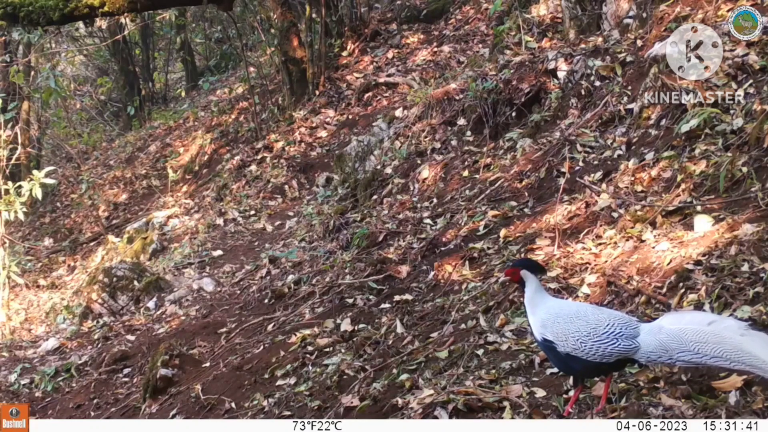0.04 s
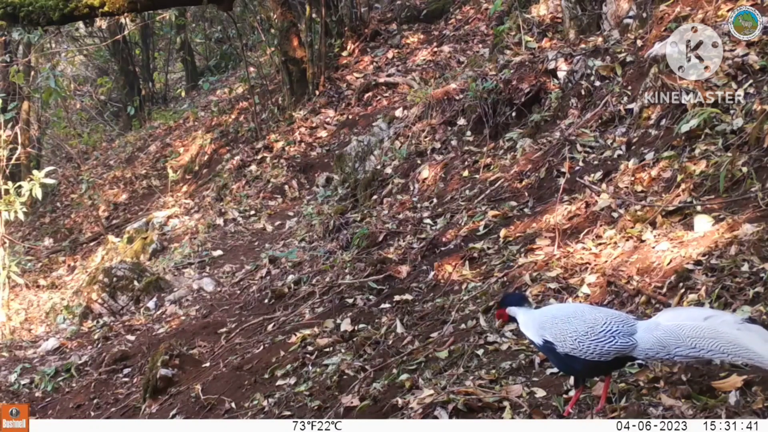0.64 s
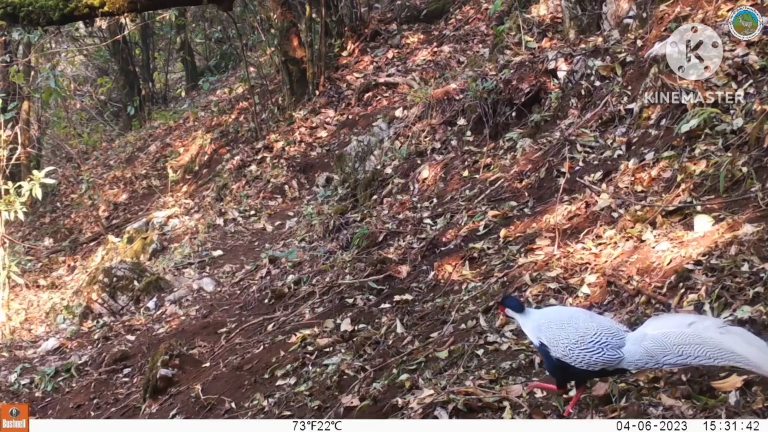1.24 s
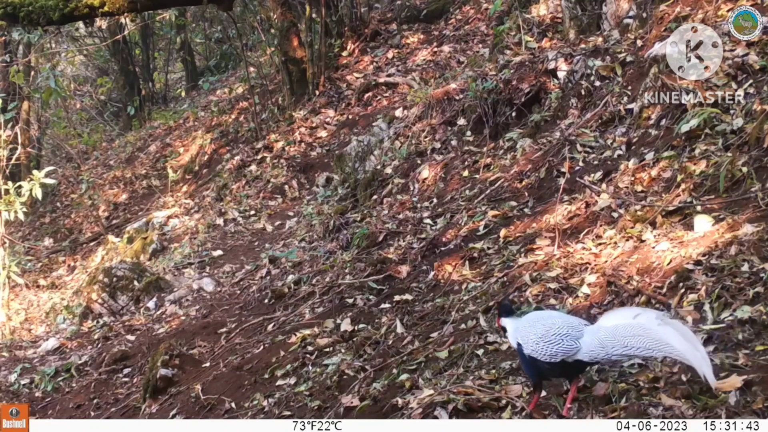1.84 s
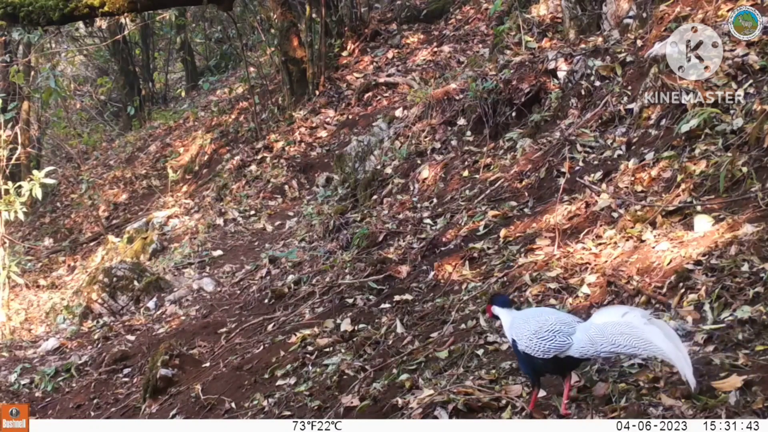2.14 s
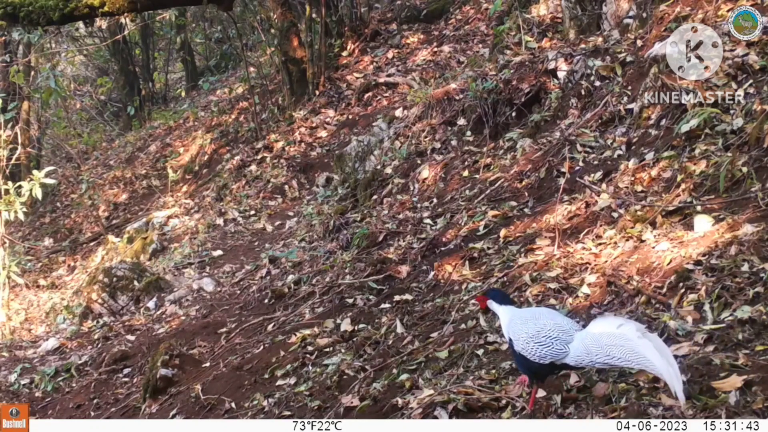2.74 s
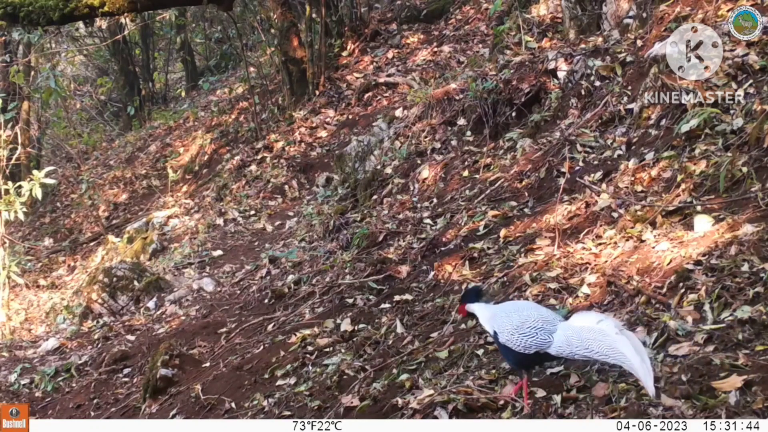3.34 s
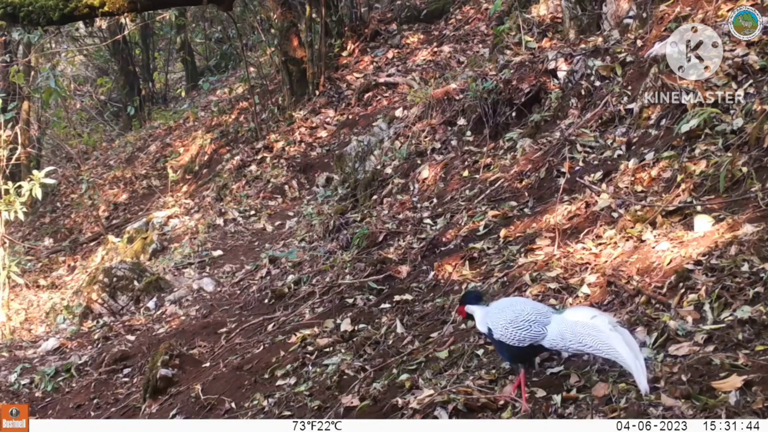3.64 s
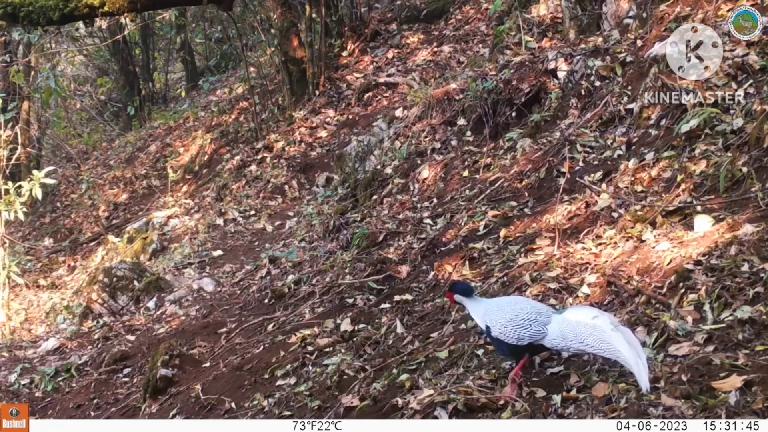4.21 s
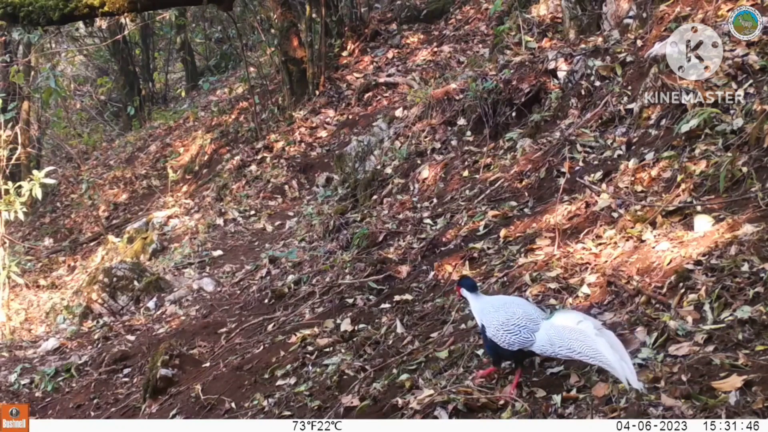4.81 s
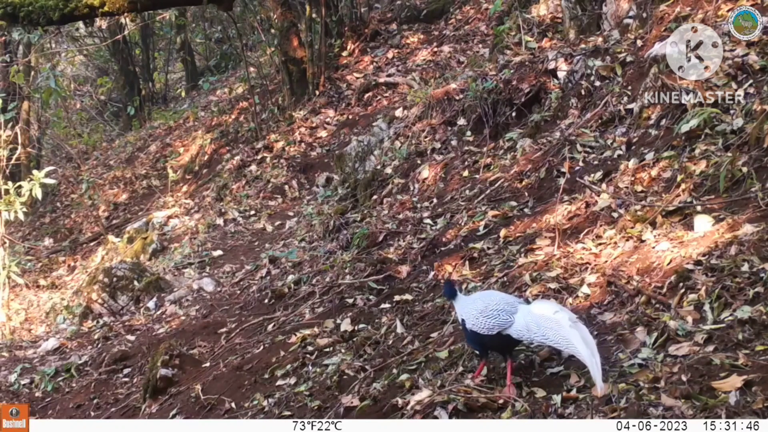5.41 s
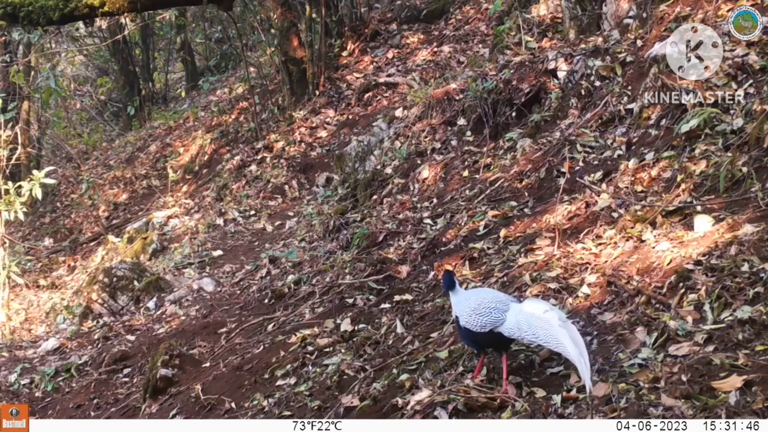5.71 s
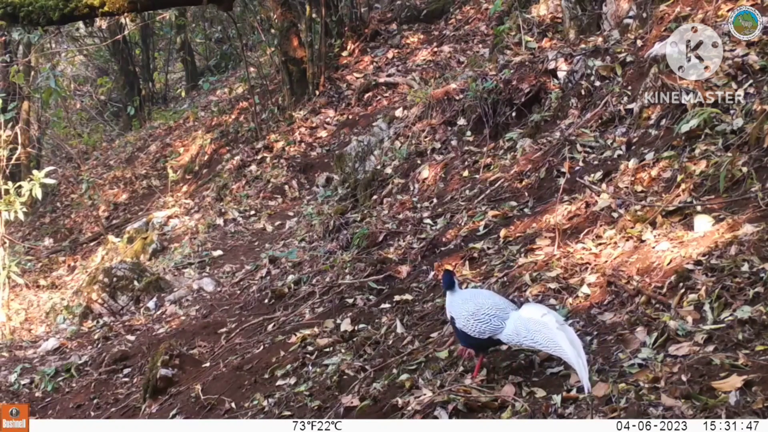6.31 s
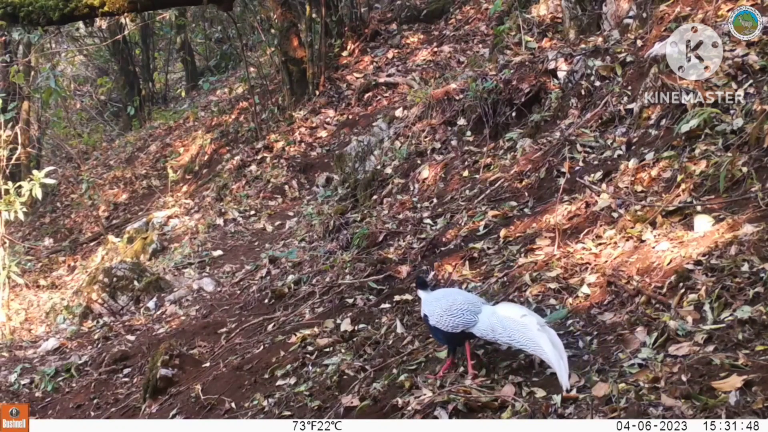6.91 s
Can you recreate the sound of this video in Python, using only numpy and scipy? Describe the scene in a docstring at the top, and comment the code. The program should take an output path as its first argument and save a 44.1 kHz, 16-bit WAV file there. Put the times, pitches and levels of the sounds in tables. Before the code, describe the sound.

Soft, low pheasant clucks surround a single piercing, climbing whistle, followed by crackling leaves over a quiet forest hush and insects.

```python
"""A pheasant in the woods

A pheasant walks over crackling dry leaves, clucking softly about five times a second. Once, its
cluck rises into a growl and its voice box breaks into a loud whistle that climbs and snaps down.
The trees echo it. Insects swell and fade, small birds call far off, and a distant engine hums."""
import sys
import numpy as np
from scipy import signal
from scipy.fft import rfft, irfft, next_fast_len
from scipy.io import wavfile
from scipy.ndimage import map_coordinates

SR = 44100
rng = np.random.default_rng(int(sys.argv[2]) if len(sys.argv) > 2 else 0)


def generate_wav(sig):
    """Save sig (samples, or channels by samples) to the path in sys.argv[1] as 16-bit PCM at SR."""
    pcm = np.round(np.clip(np.atleast_2d(sig).T, -1, 1) * 32767).astype(np.int16)
    wavfile.write(sys.argv[1], SR, pcm)


N = 306494
TIME = np.arange(N) / SR

# How the throat shapes the voice with the beak closed. Each row: frequency in Hz, gain in dB.
THROAT = [(120, 7), (200, -0.5), (330, -0.5), (450, -11.5), (620, -17.5), (780, -14), (930, -9.5),
          (1100, -9.5), (1300, -18), (1520, -25), (2100, -31), (2600, -38)]


def clucks():
    """Short hoots that arch, drop and end in a croak; harder ones are shorter, flatter and brighter."""
    # Each row: time of the peak in seconds, relative level in dB, pitch at the peak in Hz.
    calls = [(0, -50.5, 241.5), (.219, -46, 272.2), (0.438, -47, 282.7), (.626, -42.5, 304.6),
             (.83, -42.5, 298.6), (1.041, -42.5, 294.3), (1.236, -43, 289), (1.43, -43.5, 305.4),
             (1.623, -42, 298), (1.811, -42.5, 307.3), (1.995, -44, 317.7), (2.189, -44, 315.7),
             (2.372, -43.5, 322), (3.481, -34, 350.3), (3.672, -35, 353.6), (3.889, -37, 341),
             (4.109, -41.5, 307), (4.313, -43, 316.4), (4.521, -43.5, 310), (4.751, -45, 301.4),
             (4.971, -45.5, 297), (5.19, -46, 305.7), (5.407, -47, 308.7), (5.624, -47, 319.7),
             (5.851, -47, 296.5), (6.074, -47, 305.6), (6.309, -48.5, 292.3), (6.544, -48.5, 298.5),
             (6.768, -47.5, 305.5)]
    # A cluck favours odd harmonics. Gains in dB for harmonics 1, 2, 3 and all higher ones.
    hoot_db = [0, -2, 2, -1]
    # The throat's ring in the croak. Each row: frequency in Hz, gain in dB.
    throat_ring = [(750, -15.5), (1000, -12), (1170, 1), (1300, -3), (1480, -19), (1900, -33)]
    out, flutter = np.zeros(N), wobble(410)
    croak = coloured(rng.standard_normal(N), throat_ring)
    for peak_s, db, hz in calls:
        effort_db = max(db + 44, 0)  # zero for a soft cluck
        scale_s = 0.064 - 0.0012 * effort_db
        age = np.arange(-0.8, 0.7, 1 / (scale_s * SR))  # time from the peak, in units of scale_s
        here = int(peak_s * SR) + np.arange(len(age))
        slack = np.clip(age, 0, 1)  # the voice loosens after the peak
        fall = 0.96 - 0.08 * effort_db
        octaves = -fall * (age + 0.47 * age ** 2) - 1.57 * slack ** 2
        pitch = hz * 2 ** octaves * (1 + (0.026 + 0.24 * slack) * flutter[here])
        swell = np.exp(-np.abs(age / np.where(age < 0, 0.37, 0.34)) ** 2.2)
        rounder_db = 0.17 * effort_db  # effort favours the lowest harmonic
        # Overtones start each cluck muted, and later clucks are duller.
        upper_db = 0.3 - 0.45 * peak_s - rounder_db + 3 * slack - 5.5 * np.maximum(-age, 0)
        mix_db = hoot_db + np.array([0, 1, 1, 1]) * rng.normal(0, 0.92, size=4)

        def gain_db(k, f):  # harmonic number k, at f Hz
            treble_db = 2.1 * effort_db * np.clip(np.log2(f / 1100), 0, 0.6)
            harmonic_db = np.take(mix_db, k - 1, mode="clip") + (k > 1) * upper_db
            return along(THROAT, f) + harmonic_db + treble_db

        hoot = swell * voice(pitch, gain_db, count=10)
        rough = amp(-8.5 - rounder_db) * np.exp(-((age - 0.22) / 0.12) ** 2) * croak[here]
        add(out, peak_s + age[0] * scale_s, amp(db - 1.4) * (hoot + rough))
    return out


def growl():
    """A held, rising cluck that grows buzzy as the beak opens."""
    # Each row: time in seconds, pitch in Hz, relative level in dB.
    path = [(2.45, 234, -63), (2.48, 244, -62), (2.52, 255, -49), (2.55, 277, -43), (2.57, 314, -40),
            (2.58, 284, -50), (2.59, 282, -73.5)]
    out = np.zeros(N)
    span = (TIME >= path[0][0]) & (TIME <= path[-1][0])
    pitch, db = (curve[span] for curve in curves(path))
    opening = np.linspace(0, 1, len(pitch))
    pitch = pitch * (1 + 0.08 * opening ** 4 * wobble(400)[span])

    def gain_db(k, f):
        buzz_db = np.interp(f, [398, 1140, 1656, 2180, 2970], [-0.5, -2.5, 23, 19, 14])
        return along(THROAT, f) + np.sqrt(opening) * buzz_db

    out[span] = amp(db) * soft_ends(span) * voice(pitch, gain_db, count=10)
    return out


def whistle():
    """The voice box winds up reedily, leaps to a pure note, then rasps down as its tension lets go."""
    # The held high note. Each row: time in seconds, pitch in Hz, relative level in dB.
    held_note = [(2.68, 3286, -12.5), (2.696, 3673, -21), (2.758, 4204, -25.5), (2.836, 4482, -20.5),
                 (2.944, 4555, -20), (2.994, 4611, -27), (3.018, 4703, -16), (3.142, 4758, -17.5),
                 (3.146, 4781, -20), (3.236, 4926, -17), (3.27, 5270, -12.5), (3.28, 5165, -14.5)]
    # The voice box favours even harmonics. Gains in dB for harmonics 1 to 6.
    harmonics_db = [-1.5, -1, -30.5, -20.5, -46, -33.5]
    # The throat with the beak open. Each row: frequency in Hz, gain in dB.
    open_beak = [(750, -20.5), (1200, -19.5), (1850, -22.5), (2400, -15.5), (3300, -3), (5300, -2),
                 (7000, 4), (9200, -7), (11000, -16.5), (14000, -37)]
    # Air rushing through the beak. Each row: frequency in Hz, gain in dB.
    breath = [(600, -49.5), (2000, -26.5), (3800, -8), (7000, -1.5), (9000, -12.5), (11500, -19),
              (15000, -37.5)]
    # A faint sheen over the whistle. Each row: frequency in Hz, gain in dB.
    fizz = [(10000, -44), (10900, -11.5), (11800, -23), (13000, 3), (14000, 2.5), (15500, -6)]
    windup_s, break_s, held_s, release_s = 2.59, 2.657, held_note[0][0], 3.281
    windup_hz, break_hz, pinch_hz, slack_hz = 787, 1716, 4780, 801.5
    out = np.zeros(N)
    span = (TIME >= windup_s) & (TIME <= release_s + 0.026)
    t = TIME[span]
    held_hz, held_db = (curve[span] for curve in curves(held_note))
    # The stages of the call, each between 0 and 1.
    leap = 1 - (1 - ramp(t, break_s, held_s)) ** 2
    unsettled = np.exp(-np.maximum(t - break_s, 0) / 0.033)
    drop = 1 - np.exp(-(np.maximum(t - release_s, 0) / 0.011) ** 1.6)
    rasp = np.sin(np.pi * drop ** 1.2)  # strongest midway through the drop

    rising_hz = windup_hz * (break_hz / windup_hz) ** (ramp(t, windup_s, break_s) ** 1.7)
    pitch = blend(blend(rising_hz, held_hz, leap), slack_hz, drop)
    pitch = pitch * (1 + 0.0023 * wobble(45)[span] + 0.00064 * wobble(740)[span])
    # The voice comes in 33 pushes a second until the high note settles.
    stutter_db = 3.5 * unsettled * np.cos(2 * np.pi * 33 * (t - held_s))
    level_db = blend(-28, held_db + 2.6, leap) + stutter_db - 15.5 * drop ** 4 + 1.9 * wobble(75)[span]
    # Overtones fade when the voice box is pulled tight above pinch_hz, and fail in mid-leap.
    reedy_db, rasp_db = 6.5, -3
    pure_db = -16.5 - 0.5 * np.maximum(pitch - pinch_hz, 0)
    upper_db = blend(blend(reedy_db, pure_db, leap), rasp_db, rasp) - 11.5 * np.sin(np.pi * leap) ** 2

    def gain_db(k, f):
        return along(open_beak, f) + np.take(harmonics_db, k - 1) + (k > 1) * upper_db

    tone = voice(pitch, gain_db, count=6)
    air_db = blend(blend(-35.5, -22.5, unsettled), -8.5, rasp)
    air = amp(air_db) * coloured(rng.standard_normal(N), breath)[span]
    sheen = amp(-42.5) * coloured(rng.standard_normal(N), fizz)[span]
    fade = ramp(t, windup_s, windup_s + 0.03) * soft_ends(span)
    out[span] = amp(level_db) * fade * (tone + air + sheen)
    return out


def footsteps():
    """Dry leaves and twigs crack under the feet, over a crinkle of tiny clicks."""
    # Each row: start in seconds, peak level in dB, pitch in Hz.
    snaps = [(3.607, -33, 8840), (3.773, -33, 8940), (3.791, -32, 7600), (3.798, -25, 9800),
             (3.883, -35.5, 8350), (3.994, -32, 8400), (4.147, -25, 6850), (4.151, -28, 6300),
             (5.969, -36, 4100), (6.066, -38, 2980), (6.163, -31, 4800), (6.208, -33, 6050)]
    # Feet shuffling in the leaves. Each row: middle in seconds, level in dB, half length in seconds.
    shuffles = [(1.82, -58, 0.12), (3.81, -55.5, .025), (5.04, -54.5, 0.034), (5.274, -50.5, 0.098),
                (5.978, -46.5, 0.011), (6.066, -49, 0.015), (6.2, -51, 0.042)]
    # The tone colour of the crinkle. Each row: frequency in Hz, gain in dB.
    leaves = [(800, -50), (2400, -4.5), (4000, -3.5), (6500, 2), (9000, -4.5), (12000, -10.5), (15500, -29)]
    out, t = np.zeros(N), np.arange(SR // 20) / SR
    for start_s, db, hz in snaps:
        decay = amp(-60 * t / 0.0093) + amp(-9.5 - 60 * t / 0.034)
        band = signal.butter(2, [hz * 0.63, min(hz * 1.35, 15000)], "band", fs=SR, output="sos")
        crack = signal.sosfilt(band, rng.standard_normal(len(t)) * decay)
        add(out, start_s, amp(db) * crack / np.abs(crack).max())
    pressure = sum(amp(db) * np.exp(-0.5 * ((TIME - s) / half) ** 2) for s, db, half in shuffles)
    clicks = rng.standard_normal(N) * (rng.random(N) < 2400 / SR)  # about 2400 a second
    clicks *= amp(3.4 * np.minimum(rng.exponential(size=N), 4))  # a few stand out
    return out + pressure * coloured(clicks, leaves)


def insects():
    """A shrill chorus that builds slowly and collapses about once a second, with a faint wing flutter."""
    # Each row: time of the crest in seconds, level in dB, build-up in dB per second.
    crests = [(.82, -49, 8), (1.96, -48, 13), (3.12, -52.5, 7.5), (4.29, -47.5, 22), (5.59, -48.5, 14),
              (6.95, -49, 39.5)]
    # The tone colour of the quiet chorus. Each row: frequency in Hz, gain in dB.
    shrill = [(2500, -30.5), (3200, -13.5), (4050, -5.5), (4800, -16.5), (5700, -7), (6400, -0.5),
              (7300, -3), (8300, -4), (9000, -11.5), (11000, -28)]
    ebb_db_per_s, lull_db = 97, -58.5
    swells = [db - np.maximum(rise * (s - TIME), ebb_db_per_s * (TIME - s)) for s, db, rise in crests]
    level_db = np.maximum(np.max(swells, axis=0), lull_db)
    wings = np.sin(2 * np.pi * np.cumsum(31 + 2 * wobble(2.1)) / SR)
    low = coloured(rng.standard_normal(N), shrill)
    high = coloured(rng.standard_normal(N), [(5800, -50), (6700, -1), (7600, 0), (8350, -5), (8900, -31)])
    high_share = 0.92 * np.clip((level_db + 55.5) / 9, 0, 1)  # they sing higher at each crest
    return amp(level_db + 1.2 * wings) * (np.sqrt(1 - high_share) * low + np.sqrt(high_share) * high)


def far_birds():
    """Small birds sing thin, gliding notes."""
    # Each row: start in seconds, length in seconds, first and last pitch in Hz, relative level in dB.
    chirps = [(.923, .14, 1520, 2320, -71), (1.02, 0.13, 2325, 2400, -67.5), (2.119, .1, 5500, 3900, -67),
              (4.645, 0.04, 1794, 1674, -66), (4.882, 0.063, 1987, 2515, -67),
              (4.931, .058, 2480, 1910, -65.5), (5.695, 0.07, 5180, 4780, -65),
              (5.803, 0.074, 4600, 3970, -62.5), (6.541, .048, 6750, 6820, -56.5)]
    out = np.zeros(N)
    for start_s, length_s, start_hz, end_hz, db in chirps:
        count = int(length_s * SR)
        pitch = np.linspace(start_hz, end_hz, count) + 45 * wobble(139)[:count]
        tone = np.sin(2 * np.pi * np.cumsum(pitch) / SR)
        add(out, start_s, amp(db) * signal.windows.tukey(count, 0.6) * tone)
    return out


def distant_engine():
    """A drifting exhaust tone over a low, wavering hum."""
    # Each row: time in seconds, exhaust pitch in Hz, relative level in dB.
    exhaust_path = [(0, 68, -63.5), (1.2, 67.5, -62.5), (2.5, 66.5, -59.5), (3.6, 64, -60),
                    (4.3, 62.5, -58), (5.5, 62, -63.5), (6.95, 64, -59)]
    # The tones of the hum. Each row: pitch in Hz, average level in dB.
    hum_tones = [(30, -69.5), (90, -70.5), (120, -77), (150, -75), (180, -75)]
    hz, db = curves(exhaust_path)
    exhaust = amp(db - 3.5 + 2 * wobble(5)) * np.sin(2 * np.pi * np.cumsum(hz) / SR)
    hum = sum(amp(level + 3.9 * wobble(3.2)) * np.sin(2 * np.pi * f * TIME + 0.5 * wobble(3.08))
              for f, level in hum_tones)
    return np.sqrt(2) * (exhaust + hum)


def still_air():
    """The soft, steady hush of forest air."""
    # Each row: frequency in Hz, gain in dB.
    hush = [(12, -26.5), (22, -4.5), (50, -4), (100, -6), (150, -13), (230, -11), (330, -13), (500, -16),
            (1100, -20.5), (2300, -22), (3400, -19), (4600, -21), (6000, -22), (15500, -24)]
    return amp(-56.5) * coloured(rng.standard_normal(N), hush)


def with_echoes(sound, trunks_db, tail_db):
    """The slope and near trunks send back separate copies of a sound; far trees add a smooth tail."""
    # The tail. Each row: frequency in Hz, seconds it takes to fade by 60 dB.
    fade_times = [(200, 0.52), (1200, 0.23), (3500, 0.32), (5200, 0.42), (9000, 0.48), (15000, 0.045)]
    # The separate copies. Each row: delay in seconds, relative level in dB.
    bounces = [(.0068, -7.5), (0.0111, -4), (.0153, 1), (.0231, -2.5), (0.03, -8.5), (.0402, -1.5),
               (0.0577, -13)]
    hz, t, noise = signal.stft(rng.standard_normal(SR * 3 // 4), SR, nperseg=256)
    tail = signal.istft(noise * amp(-60 * t / along(fade_times, hz)[:, None]), SR, nperseg=256)[1]
    trunks = np.zeros(len(tail))
    for delay_s, db in bounces:
        trunks[round(delay_s * SR)] += amp(db)
    echo = amp(trunks_db) * trunks / np.linalg.norm(trunks) + amp(tail_db) * tail / np.linalg.norm(tail)
    return sound + signal.fftconvolve(sound, echo)[:N]


def voice(pitch, gain_db, count):
    """Harmonics (whole multiples) of a moving pitch, each weighted by gain_db(number, Hz)."""
    phase = 2 * np.pi * np.cumsum(pitch) / SR
    k = np.arange(1, count + 1)[:, None]
    gains = amp(gain_db(k, k * pitch)) * (k * pitch < SR / 2)
    return np.sqrt(2) * np.sum(gains * np.sin(k * phase), axis=0)


def amp(db):
    """Turn decibels into a gain."""
    return 10 ** (np.asarray(db) / 20)


def along(points, hz):
    """Read between (Hz, value) points, on a logarithmic frequency scale."""
    f, values = np.transpose(points)
    return np.interp(np.log(hz + 1), np.log(f + 1), values)


def curves(rows):
    """One value per sample for each column after the time."""
    times, *columns = np.transpose(rows)
    return [np.interp(TIME, times, column) for column in columns]


def wobble(rate):
    """A smooth curve through `rate` random points a second."""
    return map_coordinates(rng.standard_normal(int(7 * rate) + 5), [TIME * rate])


def filtered(x, response):
    """Scale each frequency in x by the gain response(Hz)."""
    size = next_fast_len(N + 8192)
    return irfft(rfft(x, size) * response(np.fft.rfftfreq(size, 1 / SR)), size)[:N]


def coloured(x, spectrum):
    """Shape x with (Hz, dB) points, then bring its average power to 1."""
    shaped = filtered(x, lambda hz: amp(along(spectrum, hz)))
    return shaped / np.sqrt(np.mean(shaped ** 2) + 1e-20)


def add(track, start_s, sound):
    """Mix a sound into the track from start_s on."""
    i = round(start_s * SR)
    part = sound[max(-i, 0):max(N - i, 0)]
    track[max(i, 0):][:len(part)] += part


def soft_ends(span):
    """A gain that quickly fades a call in and out at the ends of its span."""
    return signal.windows.tukey(int(span.sum()), 0.008)


def blend(a, b, share):
    """From a to b as share goes from 0 to 1."""
    return a + share * (b - a)


def ramp(t, start, end):
    """0 before start, 1 after end, a straight line between."""
    return np.clip((t - start) / (end - start), 0, 1)


def scene():
    """The pheasant is near; soft leaves swallow the echo of its low notes, trunks scatter the rest."""
    clucking = clucks() + growl()
    low_notes = filtered(clucking, lambda hz: 1 / (1 + (hz / 650) ** 6))
    near = low_notes + with_echoes(clucking - low_notes, trunks_db=-18.5, tail_db=-8)
    call = with_echoes(whistle(), trunks_db=-10, tail_db=-7)
    steps = with_echoes(footsteps(), trunks_db=-22.5, tail_db=-6.5)
    birds = amp(1) * with_echoes(far_birds(), trunks_db=4, tail_db=0)
    return (near + call + steps + birds + insects() + distant_engine() + still_air())[None]


def record(dry):
    """A faint copy, shifted up in frequency, joins the sound, and the highest treble is cut off."""
    shift_hz, copy_db, top_hz = 6140, -44.5, 15650
    shift = np.exp(2j * np.pi * shift_hz * TIME)
    shifted = np.real(signal.hilbert(dry[0], next_fast_len(N))[:N] * shift)
    return filtered(dry[0] + amp(copy_db) * shifted, lambda hz: hz < top_hz)[None]


dry = scene()
out = record(dry)
generate_wav(out)
```